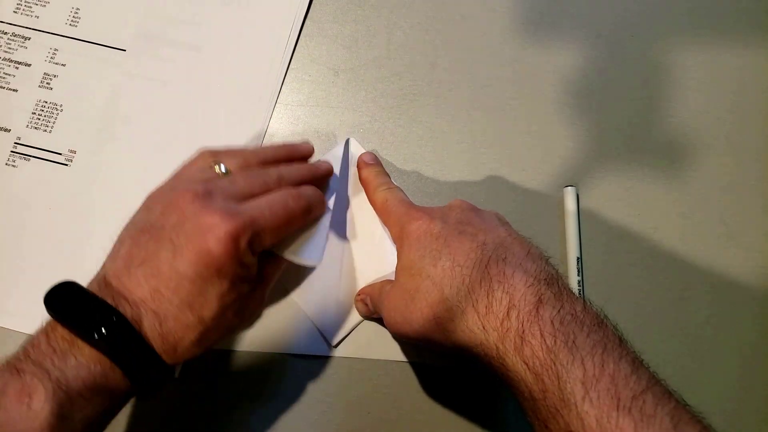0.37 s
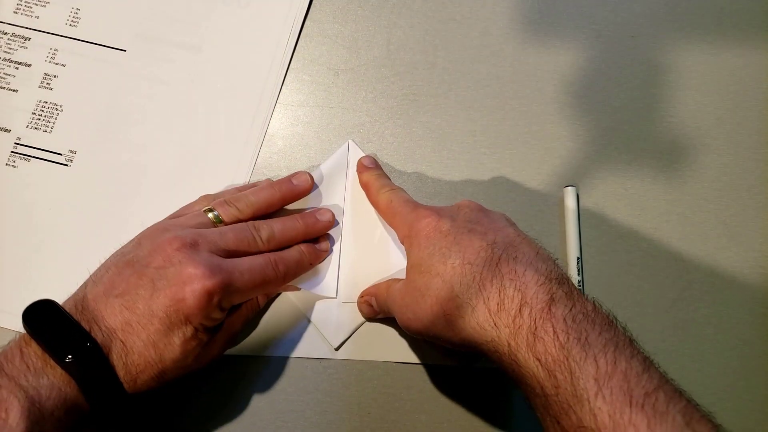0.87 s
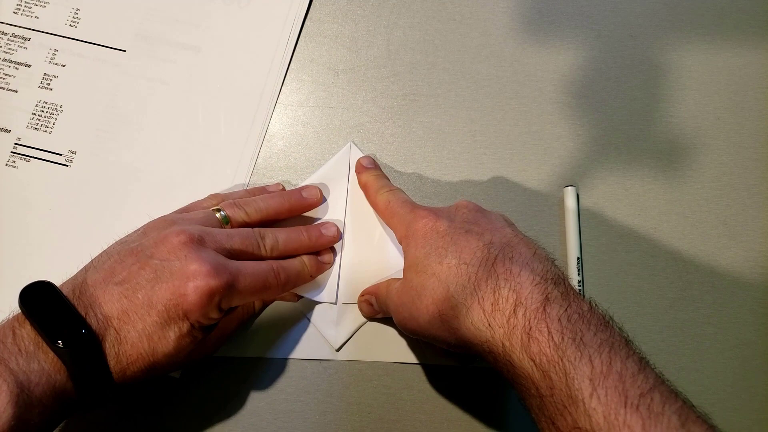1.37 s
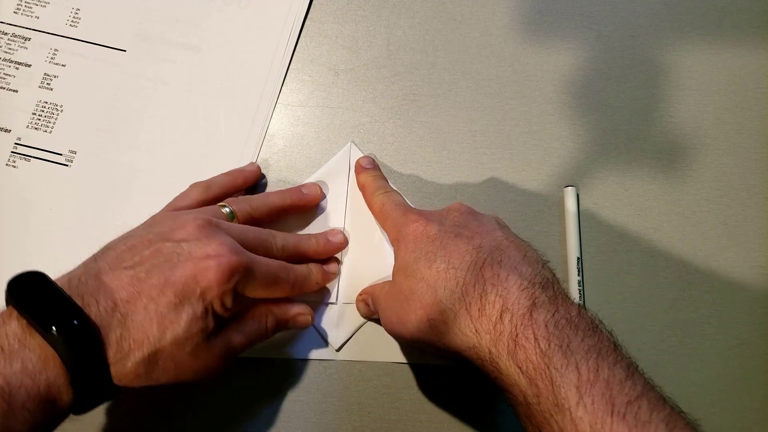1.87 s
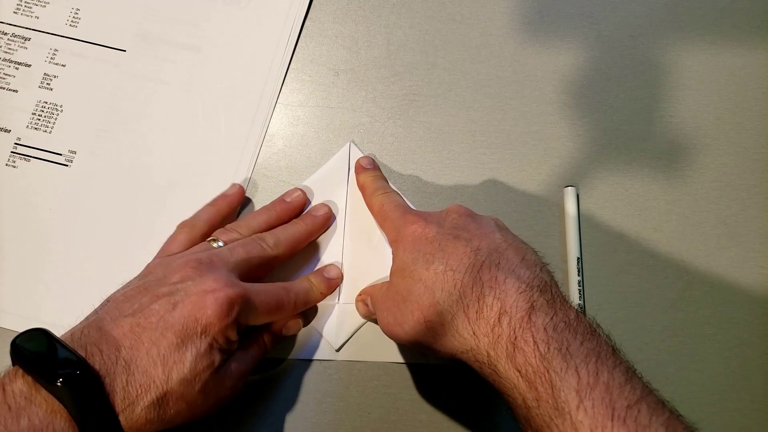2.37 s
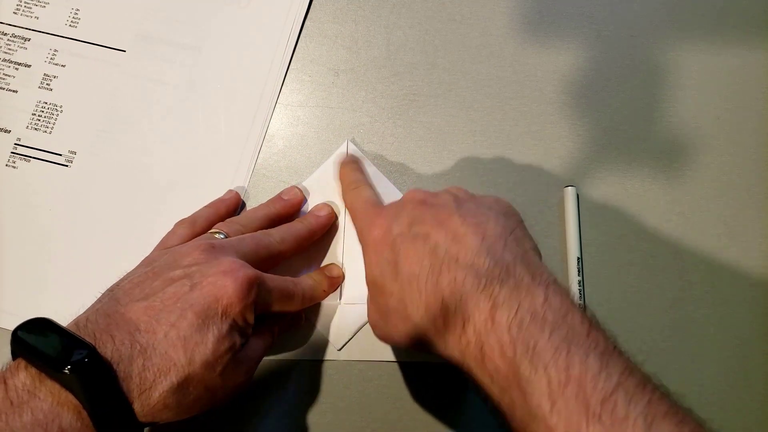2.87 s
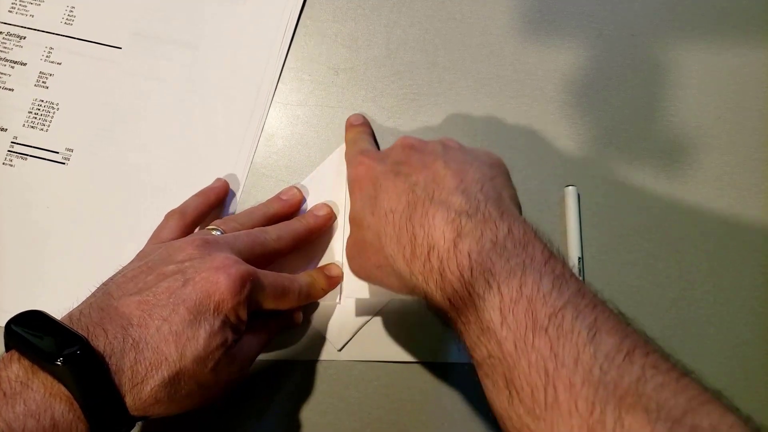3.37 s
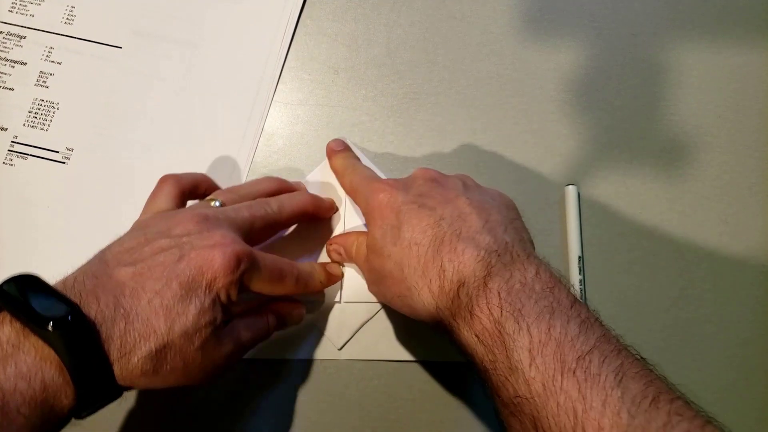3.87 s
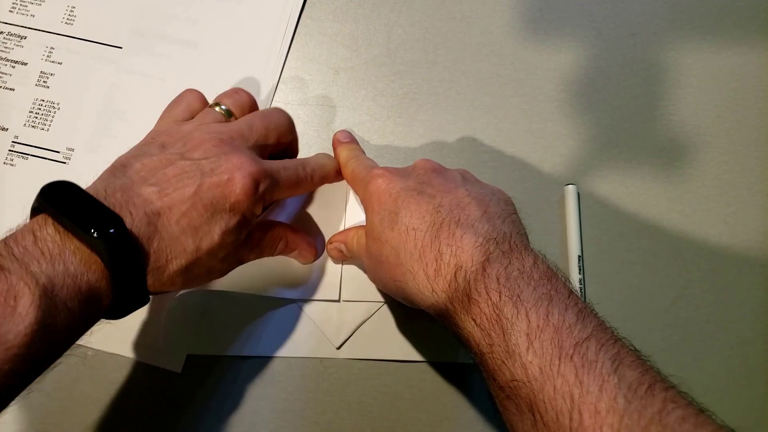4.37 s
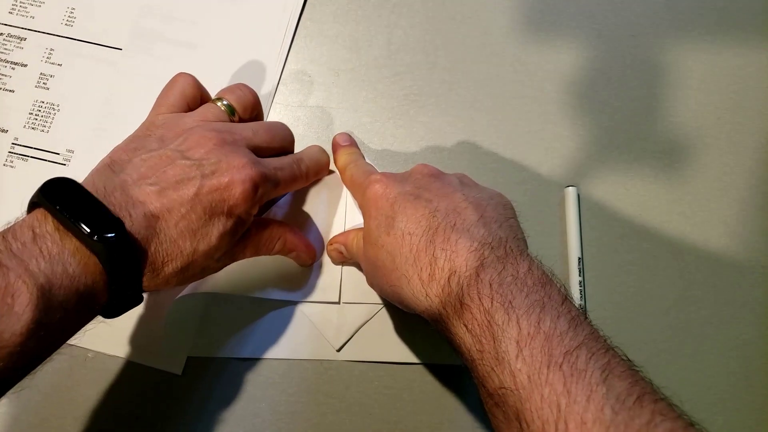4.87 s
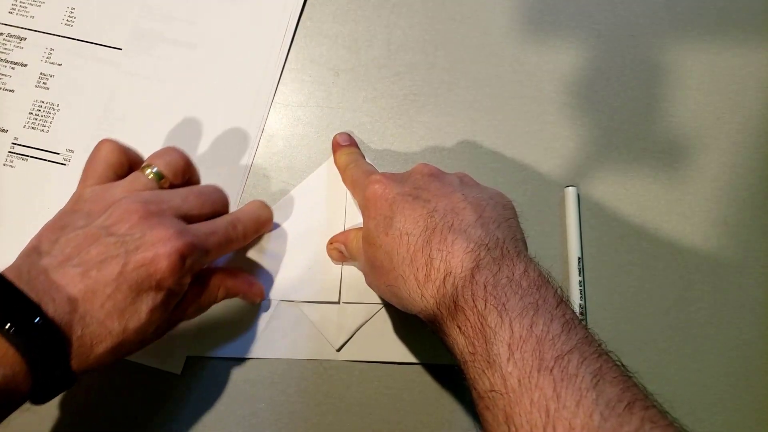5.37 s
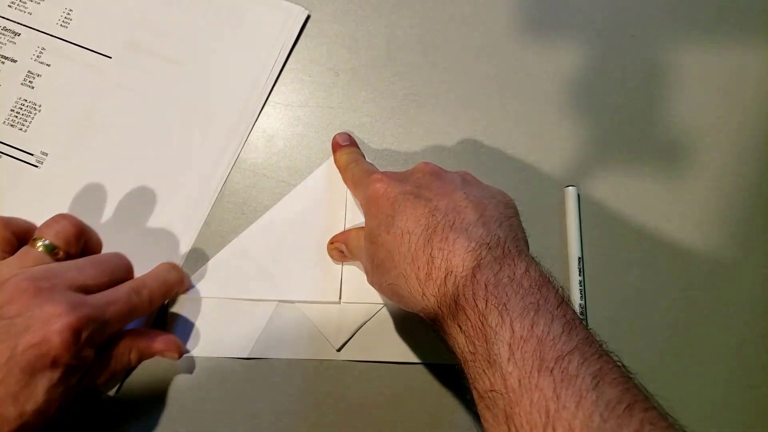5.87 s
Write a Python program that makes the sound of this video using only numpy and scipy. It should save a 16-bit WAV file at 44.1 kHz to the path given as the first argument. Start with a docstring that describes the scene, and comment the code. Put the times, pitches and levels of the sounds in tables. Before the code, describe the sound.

Close stereo pickup of paper being folded on a desk in a small, dry room, the paper weighted to the left, over faint ventilation air, low hum and a thin wavering whine. At 0.1 s a very sharp crackle bursts out amid bright rustling; more snaps follow at 0.28, 0.39 and 0.68 s. Grainy rubs and a hollow scrape press the fold from 0.45 s, and another hard snap lands at 1.16 s. Softer strokes brush at 1.7 s, then sparse light rubs and tiny ticks until a small snap at 2.9 s. Around 3.6 s paper crackles and a wrist bumps the desk dully; rustles follow at 4.1 s. After a near-quiet lull, a thin airy scrape rises from 5.0 s with a crisp snap at 5.2 s, stronger rubbing and a snap at 5.6-5.7 s, and low soft desk thuds from 5.3 s to about 6 s.

```python
"""A sheet of paper is folded and creased by hand on a desk, left of a close pair of microphone ports.
Buckles snap over as swarms of fibre cracks that ring the sheet; lone fibres tick.
Fingers rub it as bands of grainy noise, and a hollow scrape glides; wrists bump the desk top's modes.
A small room answers snaps and ticks, over the air noise, hum and thin whine of its ventilation."""
import sys
import numpy as np
from scipy import signal
from scipy.fft import rfft, irfft, next_fast_len
from scipy.io import wavfile
from scipy.ndimage import uniform_filter1d

SR = 44100
rng = np.random.default_rng(int(sys.argv[2]) if len(sys.argv) > 2 else 0)


def persist_wave(psi):
    """Save psi, clipped to +-1, as 16-bit WAV."""
    counts = np.round(np.clip(psi, -1, 1) * 32767).astype(np.int16)
    wavfile.write(sys.argv[1], SR, np.atleast_2d(counts).T)


def voltage_ratio(level):
    """Linear amplitude factor for a level in decibels (scalar or array-like)."""
    return 10 ** (np.asarray(level, float) / 20)


N = 275217  # samples
SIZE = next_fast_len(N)
HZ = np.maximum(np.arange(SIZE // 2 + 1) * SR / SIZE, 1.)
TIME = np.arange(N) / SR  # seconds

# How alike the two ports hear hands, sheet and desk. Each row: frequency in Hz, likeness from 0 to 1.
CONTACT_ALIKE = [(200, 0.75), (700, 0.74), (1500, 0.12), (4000, 0.12), (12000, 0.051)]


def read(table):
    """Value of a (Hz, value) table at every frequency, interpolated over log frequency."""
    hz, value = np.transpose(table)
    return np.interp(np.log(HZ), np.log(hz), value)


def band(x, lo_hz, hi_hz):
    """Causal band-pass."""
    edges_hz = [lo_hz, min(hi_hz, .45 * SR)]
    return signal.sosfilt(signal.butter(2, edges_hz, "band", fs=SR, output="sos"), x)


def ring(x, hz, t60):
    """One damped mode dying 60 dB in t60 seconds; peak gain of a click near 1."""
    pole = np.exp(2j * np.pi * hz / SR - np.log(1000) / (t60 * SR))
    return signal.lfilter([1], [1, -pole], x).imag


def peak(hz, width):
    """Gain of a resonance, width in Hz."""
    return 1 / np.sqrt(1 + (2 * (HZ - hz) / width) ** 4)


def walk(rate):
    """Random levels held 1 / rate seconds and slewed twice; spread near 1."""
    hold = int(SR / rate)
    steps = np.repeat(rng.standard_normal(N // hold + 1), hold)
    return 1.6 * uniform_filter1d(uniform_filter1d(steps, hold), hold)[:N]


def fibres(spread_db):
    """Dense slips of paper fibres: most are tiny, a few stand out."""
    size = np.minimum(rng.exponential(size=N // 8 + 1), 5.5)
    return rng.standard_normal(N) * voltage_ratio(spread_db * size.repeat(8)[:N])


def spread(gain, alike, source):
    """A wide source at two ports: a shared part and a part of opposite sign, coloured by gain; mean rms 1."""
    # Tilt between the ports. Each row: frequency in Hz, left minus right in dB.
    left_db = [(60, 3.4), (200, 2.7), (500, 6.2), (1290, 8), (2400, 7.8), (4400, 10.1), (8000, 9.5),
               (15000, 0.52)]
    c = np.clip(read(alike), 0, 1)
    mid, side = (rfft(source(), SIZE) * gain for _ in range(2))
    mid, side = np.sqrt(1 + c) * mid, np.sqrt(1 - c) * side
    tilt = voltage_ratio(read(left_db) / 2)
    pair = irfft(np.array([(mid + side) * tilt, (mid - side) / tilt]), SIZE)[:, :N]
    return pair / np.sqrt(np.mean(pair.mean(axis=0) ** 2))


def ventilation():
    """Steady air noise, narrow bands of hum and a thin motor whine that wavers in pitch and level."""
    # Colour of the air noise. Each row: frequency in Hz, relative density in dB per Hz.
    air_tone = [(25, -27), (53, -2), (92, -14), (117, -1), (200, -9), (250, -3), (360, -20), (476, -4.5),
                (1230, -23.5), (1940, -33.5), (2550, -20.5), (3200, -52.5), (7500, -36.5), (8500, -64)]
    # Motor and duct hum. Each row: centre in Hz, width in Hz, level in dB.
    hum = [(119.1, 4.6, -74), (246.5, 11, -70.5), (433.4, 5.5, -74)]
    # How alike the ports hear the air. Each row: frequency in Hz, likeness from 0 to 1.
    air_alike = [(60, 0.81), (130, 0.97), (290, 0.89), (640, 0.49), (1400, .05)]
    air_db, whine_db, whine_hz = -60.5, -74, 1418

    def noise():
        return rng.standard_normal(N)

    air = spread(voltage_ratio(read(air_tone)), air_alike, noise) * voltage_ratio(air_db + 0.13 * walk(6))
    whine_level = voltage_ratio(whine_db + 1.4 * walk(9.3))
    whine = whine_level * np.sin(2 * np.pi * np.cumsum(whine_hz + 3 * walk(12)) / SR)
    whine_pair = whine * voltage_ratio(np.array([[3.], [-3.]]))  # dB at left, right
    hums = sum(voltage_ratio(db) * spread(peak(hz, width), air_alike, noise) for hz, width, db in hum)
    return air + whine_pair + hums


def desk():
    """Soft pushes ring the deep modes; dragging hands keep the panel resonances murmuring."""
    # Wrist bumps. Each row: start in seconds, peak in dB before the port tilt, push in ms, ring T60 in seconds.
    bumps = [(0.093, -43, 31, 0.27), (3.659, -35, 25.2, 0.49), (4.008, -45.5, 4.3, 0.11),
             (5.34, -34.5, 26, 0.36), (5.429, -41.5, 26.7, 0.97), (5.901, -32, 25.8, 0.52),
             (6.018, -34, 30, 0.95)]
    # Deep modes of the desk. Each row: frequency in Hz, relative gain in dB.
    modes = [(46.6, -19.5), (69.6, -5)]
    # Panel resonances. Each row: frequency in Hz, width in Hz.
    panel_modes = [(243, 13), (321, 55), (426, 28)]
    # Hand weight dragging on the top. Each row: time in seconds, level in dB before a 6.5 dB cut.
    weight = [(0.0, -69), (0.29, -59.5), (0.62, -63.5), (2.0, -58), (3.3, -63.5), (3.81, -55), (4.14, -56),
              (4.45, -60), (4.73, -58), (5.39, -51.5), (5.7, -58), (6.0, -45), (6.24, -55.5)]
    deep = np.zeros(N)
    for s, db, ms, t60 in bumps:
        u = np.clip((TIME - s) * 1000 / ms, 0, 1)
        push = np.sin(np.pi * u) ** 2
        sway = sum(voltage_ratio(g) * ring(push, hz, max(t60, .02)) for hz, g in modes)
        deep = deep - voltage_ratio(db) * sway / np.abs(sway).max()
    panel = sum(peak(hz, width) for hz, width in panel_modes)
    drag_level = voltage_ratio(np.interp(TIME, *np.transpose(weight)) - 6.5)
    drag = spread(panel, CONTACT_ALIKE, lambda: fibres(0.71)) * drag_level
    return drag + deep * voltage_ratio(np.array([[1.2], [-1.2]]))  # dB at left, right


def hollow():
    """Air under the flap: fibre noise on a gliding centre, read faster as it rises, so the band widens."""
    # Hollow band of the scrape, gliding as the hand moves. Each row: time in seconds, centre in Hz, level in dB.
    glide = [(0.45, 1198, -70), (0.602, 1239, -55.5), (0.849, 1343, -55), (0.971, 1332, -82),
             (1.077, 1278, -53), (1.2, 1435, -72), (2.861, 3327, -104.5), (2.886, 3382, -57),
             (2.919, 3583, -100), (5.02, 2877, -85), (5.08, 2975, -67.5), (5.25, 3395, -65.5),
             (5.502, 4604, -63.5), (5.631, 4030, -59), (5.72, 2215, -100), (5.877, 1678, -66),
             (6.089, 1700, -60), (6.2, 1567, -70)]
    width = 0.32  # share of the centre
    s, hz, db = np.transpose(glide)
    cycles = np.cumsum(np.interp(TIME, s, hz)) / SR

    def source():
        slow = band(fibres(1.8) + 1j * fibres(3.2), 5.6, width * max(hz) / 2)
        return (np.interp(cycles / max(hz), TIME, slow) * np.exp(2j * np.pi * cycles)).real

    level = voltage_ratio(np.interp(TIME, s, db, left=-120, right=-120))
    return spread(1, CONTACT_ALIKE, source) * level


def touch():
    """Gains of dull rasp, bright rasp and sizzle: lasting contact plus swelling strokes, summed as power."""
    # Hands in lasting contact with the sheet. Each row: time in seconds, rub in dB, fingertip sizzle in dB,
    # bright minus dull rasp in dB.
    contact = [(0.0, -53.5, -51.5, 2.5), (0.24, -54, -56, -4), (0.37, -65, -61.5, -15),
               (0.75, -60.5, -64, -3), (0.98, -73, -106, -9), (1.386, -64, -66, 4),
               (1.44, -77.5, -88.5, -6), (1.62, -69, -80, 11.5), (1.82, -82.5, -101, -6.5),
               (3.04, -82.5, -81.5, 0.5), (3.051, -66, -71, -8), (3.19, -68.5, -60.5, 16),
               (3.235, -62.5, -60.5, -2), (3.4, -68, -72, -2.5), (3.53, -82.5, -90, -3.5),
               (3.779, -63.5, -63.5, 2.5), (3.96, -71.5, -97, -9), (4.4, -77, -80, 1),
               (4.869, -80, -100.5, 11), (5.071, -68.5, -63.5, -2), (5.25, -69, -67, 2),
               (5.56, -59, -63.5, -13), (5.65, -68, -59, -21), (5.775, -60, -54, 0),
               (5.9, -66.5, -62, -2.5), (6.24, -78, -89, -2)]
    # Short finger strokes. Each row: peak time in seconds, rub in dB, sizzle minus rub in dB,
    # bright minus dull rasp in dB, time within 10 dB of the peak in ms.
    strokes = [(0.453, -53, -1.5, -14, 151), (0.558, -48, -4, 0, 112), (0.833, -55, -3, -5.5, 101),
               (1.086, -52.5, -1.5, 3, 39), (1.148, -57, 0.5, -11, 118.5), (1.678, -52.5, -3, 7, 94),
               (1.721, -49, 1.5, 0, 39), (1.935, -60, 5, 11, 21), (2.03, -66.5, -4, 3, 317),
               (2.198, -63, 6.5, -1.5, 64), (2.391, -57.5, -4.5, 7, 33.5), (2.684, -65.5, -5.5, 6, 55),
               (2.892, -60, -1, -1, 90), (3.636, -59, -1.5, -1, 96), (4.072, -54.5, 3, 6, 104),
               (4.135, -56.5, -2, 4, 155), (4.293, -71.5, 5, 20, 60), (4.364, -77.5, 10, 11, 59),
               (4.509, -66.5, 4, 9, 77.5), (5.103, -61.5, -10, -4, 123), (5.597, -52, 1, -20, 35),
               (6.077, -63.5, 0, 3, 107)]
    swell_share = 0.39  # part of a stroke's length spent swelling, the rest fading

    def powers(rub_db, sizzle_db, bright_db):
        bright = 1 / (1 + voltage_ratio(-bright_db) ** 2)
        rub = voltage_ratio(rub_db) ** 2
        return np.array([rub * (1 - bright), rub * bright, voltage_ratio(sizzle_db) ** 2])

    s, *columns = np.transpose(contact)
    total = powers(*(np.interp(TIME, s, c) for c in columns))
    for s, db, sizzle_db, bright_db, ms in strokes:
        near = slice(max(int((s - ms / 250) * SR), 0), int((s + ms / 250) * SR))
        u = (TIME[near] - s) * 1000 / ms
        down_db = 10 * np.maximum(-u / swell_share, u / (1 - swell_share))
        total[:, near] += powers(db, db + sizzle_db, bright_db)[:, None] * voltage_ratio(-down_db) ** 2
    return np.sqrt(total)


def slide():
    """Rubbing fibres heard through the sheet: rasp, a fine sizzle and flexing of the whole sheet."""
    # Colours of rasp, fingertip sizzle and flexing. Each row: frequency in Hz, relative density in dB per Hz.
    rub_tone = [(1500, -11), (2400, 9), (3000, 5), (5100, 4.5), (7500, 4), (8500, -53.5)]
    sizzle_tone = [(4410, -17.5), (7500, 0.5), (8730, -6), (11400, 2.5), (15600, 3.5), (16100, -43.5)]
    flex_tone = [(500, 6), (800, 4.5), (1200, 6), (1600, 2.5), (2200, -5), (3000, -29)]
    # The whole sheet slowly bending. Each row: time in seconds, level in dB before rubbing and grip.
    bending = [(0.0, -117), (0.28, -53), (0.48, -78), (0.73, -70), (1.23, -64.5), (2.5, -73), (4.55, -72.5),
               (5.0, -68.5), (5.82, -67.5), (6.24, -63)]
    dull, bright, fizz = touch()
    grip = voltage_ratio(1.5 * walk(40) + .8 * walk(300))  # skin catches and lets go, slowly and as grit

    def grains(tone, part, spread_db):
        return spread(voltage_ratio(read(tone)) * np.sqrt(part), CONTACT_ALIKE, lambda: fibres(spread_db))

    upper = 1 / (1 + (4800 / HZ) ** 8)  # bright rasp lies above 4800 Hz
    rub = sum(grains(rub_tone, part, 2.56) * gain * voltage_ratio(1.7 * walk(22.1))
              for part, gain in ((1 - upper, dull), (upper, bright)))
    top = 1 / (1 + (10500 / HZ) ** 8)  # the two halves of the sizzle flicker apart
    sizzle = fizz * sum(grains(sizzle_tone, part, 1.8) * voltage_ratio(db + 1.5 * walk(25))
                        for part, db in ((1 - top, -4.0), (top, -2.2)))
    # all rubbing, lasting or quick, bends the sheet too, on top of its slow flexing
    bend = voltage_ratio(np.interp(TIME, *np.transpose(bending))) + voltage_ratio(-5.5) * np.hypot(dull, bright)
    flex = grains(flex_tone, 1, 2.24) * bend
    return (rub + flex + sizzle) * grip


def ticks():
    """Each tick is a few sharp cracks within a millisecond or two."""
    # Lone fibres letting go. Each row: start in seconds, peak in dB at the sheet, centre in Hz.
    lone_fibres = [(0.033, -31, 7000), (0.1945, -31, 4000), (0.401, -28.5, 3500), (1.4727, -53.5, 5000),
                   (1.516, -38.5, 6330), (1.797, -39, 7800), (1.84, -50, 7000), (2.753, -42.5, 9000),
                   (3.049, -43.5, 5000), (3.2238, -34.5, 6000), (3.964, -48, 10000), (4.919, -57.5, 6000),
                   (5.175, -32, 4480), (5.549, -34.5, 6030)]
    out, t = np.zeros(N), np.arange(256) / SR
    for s, db, hz in lone_fibres:
        cracks = rng.standard_normal(256) * voltage_ratio(5 * rng.exponential(size=256)) * np.exp(-t / 0.0007)
        cracks[0] = np.abs(cracks).max()
        tick = band(cracks, 0.42 * hz, 1.7 * hz)
        i = int(s * SR)
        out[i:i + 256] += voltage_ratio(db) * tick / np.abs(tick).max()
    return out


def snaps():
    """Each buckle flips with a jolt inside a short swarm of fibre cracks; both ring the sheet."""
    # Buckles snapping over. Each row: time of the swarm's crest in seconds, peak of the jolt in dB at the sheet,
    # sheet ring against it in dB, fine tearing treble against it in dB, rise of the swarm in ms
    # (held within 0.15 to 5), nominal sheet ring in Hz.
    buckles = [(0.1007, -7.5, -11, -1, 1.38, 1016), (0.1036, -6.5, -20, -12.5, 1.3, 2330),
               (0.275, -16, -6.5, -0.5, 1.6, 1040), (0.3838, -20.5, -33, -21, 1.11, 724),
               (0.386, -32, 9, 9.5, 2.3, 1030), (0.3896, -19.5, -9.5, -8.5, 2.1, 1190),
               (0.4658, -25, -1.5, -20.5, 0.61, 1230), (0.6815, -13.5, -8.5, -3.5, 0.85, 1204),
               (1.0708, -48, 6, -1.5, 2.6, 1294), (1.1624, -6.5, -0.5, -7.5, 0.51, 1370),
               (1.659, -51.5, 9.5, -13.5, 3.7, 1240), (1.7324, -33, 3.5, -2, 3.7, 1175),
               (2.004, -34.5, -12, -16, 0.34, 1380), (2.139, -43.5, -3.5, -12, 2.2, 1495),
               (2.379, -58.5, 15.5, -15.5, 2.04, 1410), (2.941, -28, -7, -3.5, 0.68, 1500),
               (3.6161, -34, -29, -6.5, 0.61, 1230), (3.6177, -23.5, -14, -7, 0.6, 1260),
               (4.0596, -34, -2, -6, 3.5, 900), (4.1757, -30.5, -6, -9.5, 2.46, 1030),
               (5.03, -29.5, -4, -23, 0.93, 1140), (5.1806, -20.5, -23, -18, 0.094, 2200),
               (5.607, -25.5, -20, -2.5, 1.4, 2340), (5.6682, -15.5, -9.5, -14.5, 0.41, 1540),
               (6.069, -47.5, 7.5, -15, 1.2, 1530)]
    # Modes of the sheet. Each row: multiple of the ring, nominal relative gain in dB, ring T60 in seconds.
    sheet_modes = [(1, 11.5, 0.012), (1.3, 6, 0.011), (1.5, 5.5, 0.016), (1.75, 4.5, 0.015)]
    # Air squeezed from under a fold that slaps shut. Each row: time in seconds, peak in dB at the sheet.
    slaps = [(0.1021, -30), (0.2742, -31), (0.383, -28.5), (3.6163, -41), (4.0567, -42), (5.6699, -32)]
    creak_ms, creak_db = 3.8, -11  # fibres creak in before the flip, less before a short one
    lead = 600  # samples of creak before the swarm
    out, early = np.zeros(N + 4096), (np.arange(4096) - lead) / SR
    t = np.maximum(early, 0)
    for s, db, ring_db, fine_db, ms, ring_hz in buckles:
        tau = np.clip(ms, .15, 5) / 1000
        creak = voltage_ratio(creak_db) * np.exp(early * 1000 / creak_ms) * min(ms, 1) ** 2 * (early < tau)
        cracks = rng.standard_normal(4096) * voltage_ratio(4 * rng.exponential(size=4096)) / 3
        swarm = cracks * ((t / tau) ** 2 * np.exp(2 - 2 * t / tau) + creak)
        flip = 0.42 * np.exp(-((early - 0.708 * tau) / .00005) ** 2)
        # a short buckle is mostly one clean jolt
        jolt = swarm + 2 * flip / flip.max() / max(tau * 1000, .5)
        # the flip rings the sheet more than the cracks do
        push = band(flip + .15 * swarm, 800, 4000)
        place = rng.standard_normal((len(sheet_modes), 2))  # every buckle sits elsewhere on the sheet
        sheet = sum(voltage_ratio(g + 2 * a) * ring(push, ring_hz * multiple * (1 + 0.052 * b), t60)
                    for (multiple, g, t60), (a, b) in zip(sheet_modes, place))
        tearing = band(swarm, 10000, 15800)
        parts = ((band(jolt, 1700, 8000), 0), (sheet, ring_db), (tearing, fine_db))
        i = int((s - tau) * SR) - lead
        out[i:i + 4096] += voltage_ratio(db) * sum(voltage_ratio(g) * p / np.abs(p).max() for p, g in parts)
    puff = band(np.exp(-(early / 0.00015) ** 2), 190, 880)
    for s, db in slaps:
        i = int(s * SR) - lead
        out[i:i + 4096] += voltage_ratio(db) * puff / np.abs(puff).max()
    return out[:N]


def ports(x):
    """A point source reaches the two microphone ports with unequal level and phase."""
    # Level at the ports. Each row: frequency in Hz, left minus right in dB.
    louder_left = [(1300, 6.8), (2400, 16), (4400, 8.6), (8000, 6), (13000, 2.5)]
    # Phase at the ports. Each row: frequency in Hz, lead of the left in radians.
    left_lead = [(400, 0), (1400, -.2), (2800, -1.2), (8000, -1.6)]
    half = voltage_ratio(read(louder_left) / 2) * np.exp(.5j * read(left_lead))
    pair = np.array([half, 1 / half])
    pair = pair / np.sqrt(np.mean(np.abs(pair) ** 2, axis=0))
    return irfft(rfft(x, SIZE) * pair, SIZE)[:, :N]


def room(x):
    """A few early echoes, then a dense tail whose treble dies first; the ports share most of the dull part."""
    # Nearby hard surfaces. Each row: least delay in ms, level in dB.
    surfaces = [(5.2, -17.5), (8, -15.5), (13.5, -20.5)]
    t60, tail_db = 0.15, -9.5  # seconds for the dull part; energy of the tail against the direct sound
    t = np.arange(int(.4 * SR)) / SR
    fade = -np.log(1000) / t60 * t
    noise = rng.standard_normal((2, 2, len(t)))
    dull = band(noise[0, 0] + 0.44 * noise[0], 200, 4000) * np.exp(fade)
    bright = voltage_ratio(3.5) * band(noise[1], 2400, 13000) * np.exp(1.46 * fade)
    tail = (dull + bright) * np.clip(t / 0.0037, 0, 1)
    tail = voltage_ratio(tail_db) * tail / np.sqrt(np.sum(tail ** 2, axis=1, keepdims=True))
    for ms, db in surfaces:
        late = ms / 1000 + 0.00053 * rng.random((2, 1))  # a little apart at the two ports
        echo = np.exp(-((t - late) / .00004) ** 2)
        tail = tail + voltage_ratio(db) * echo / echo.sum(axis=1, keepdims=True)
    return signal.fftconvolve(x, tail, axes=1)[:, :N]


def scene():
    """Hands, paper and desk in the room."""
    near = ports(snaps() + ticks())
    return near + room(near) + slide() + hollow() + desk() + ventilation()


def top_cut(x):
    """Nothing passes above the cut-off."""
    return signal.sosfilt(signal.butter(12, 16790, fs=SR, output="sos"), x)


def record(dry):
    """The microphone loses the deepest bass, below 44 Hz."""
    thin = signal.sosfilt(signal.butter(4, 44, "high", fs=SR, output="sos"), dry)
    return top_cut(thin)


dry = scene()
out = record(dry)
persist_wave(out)
```